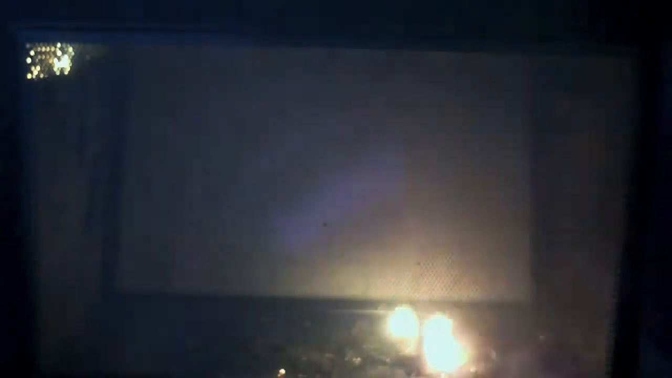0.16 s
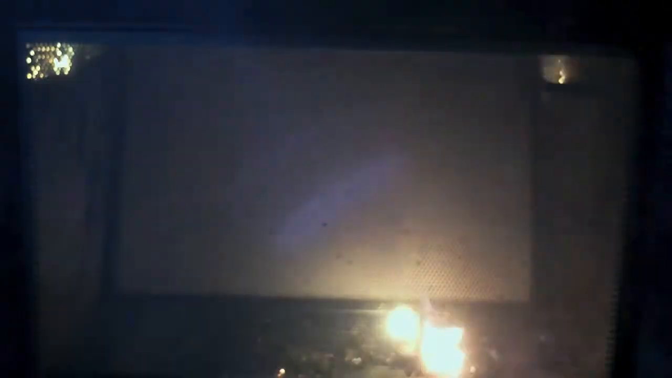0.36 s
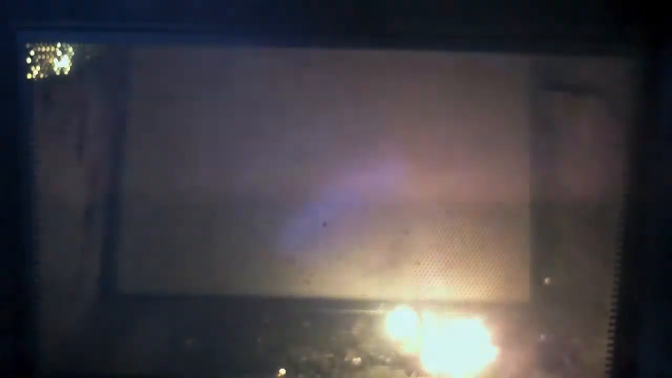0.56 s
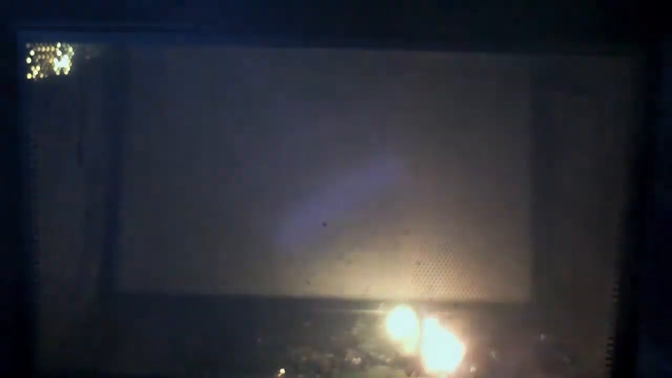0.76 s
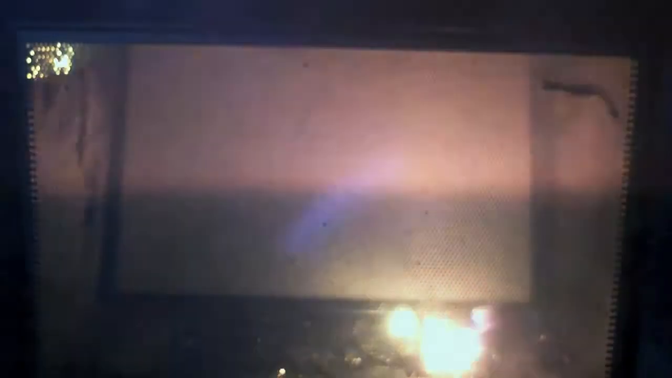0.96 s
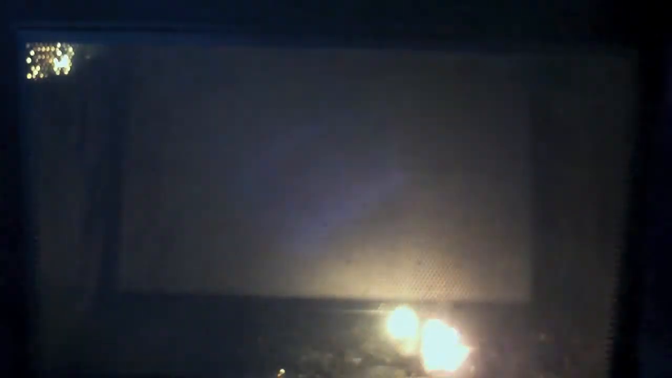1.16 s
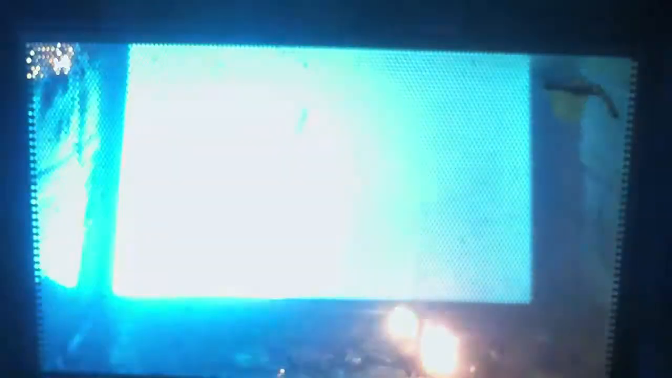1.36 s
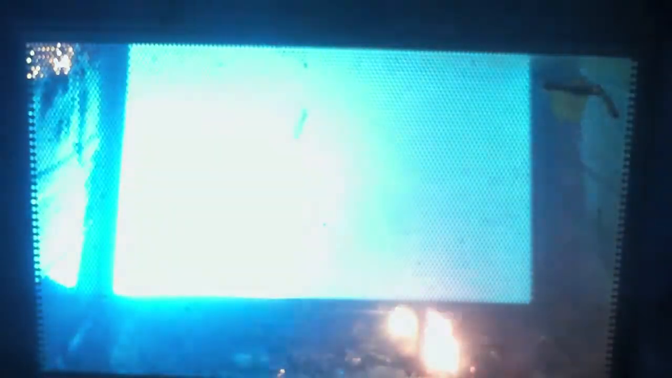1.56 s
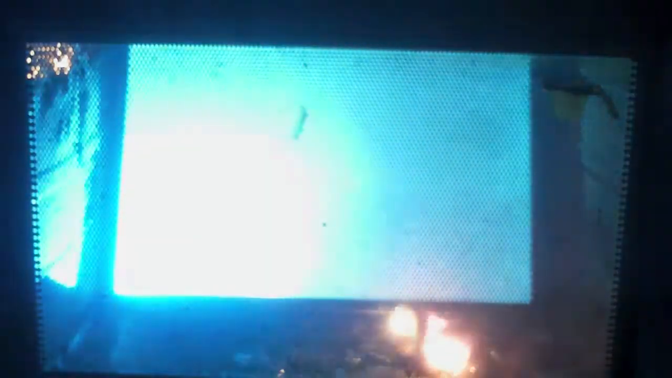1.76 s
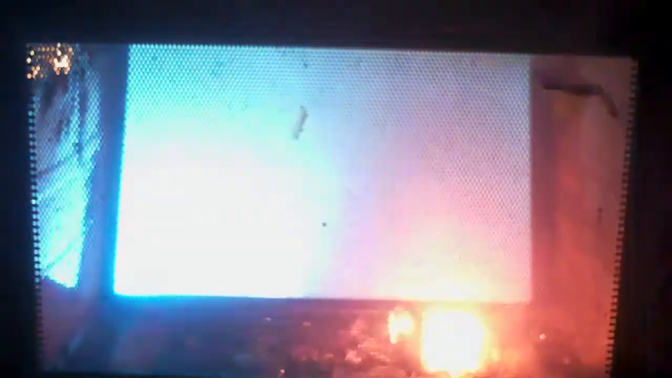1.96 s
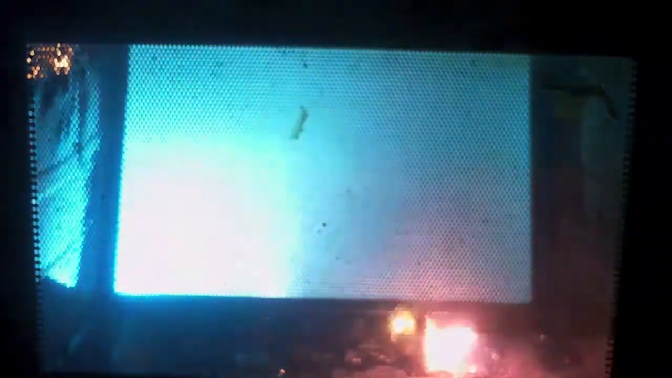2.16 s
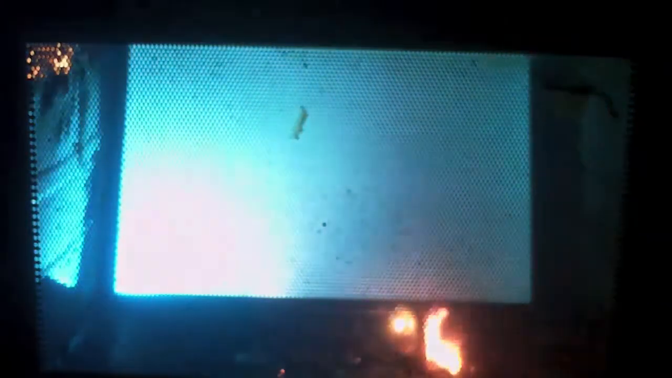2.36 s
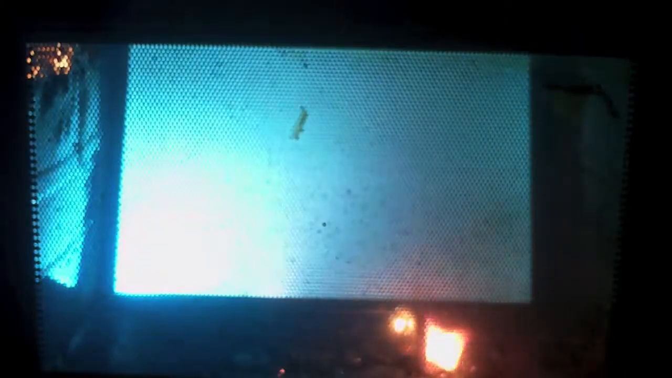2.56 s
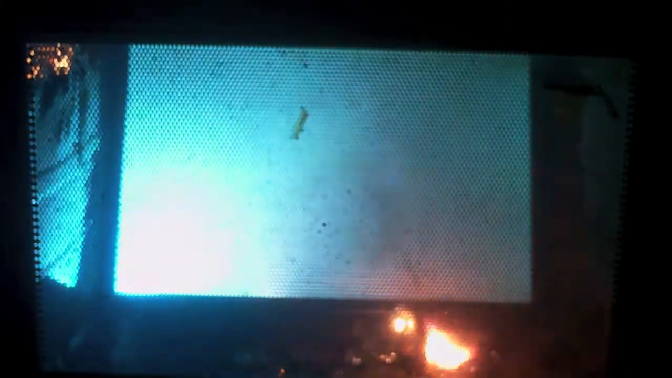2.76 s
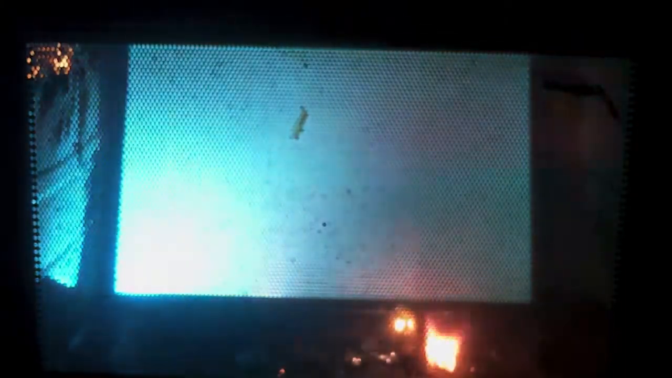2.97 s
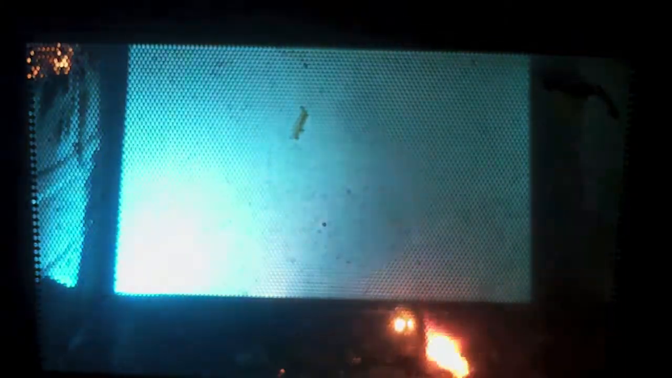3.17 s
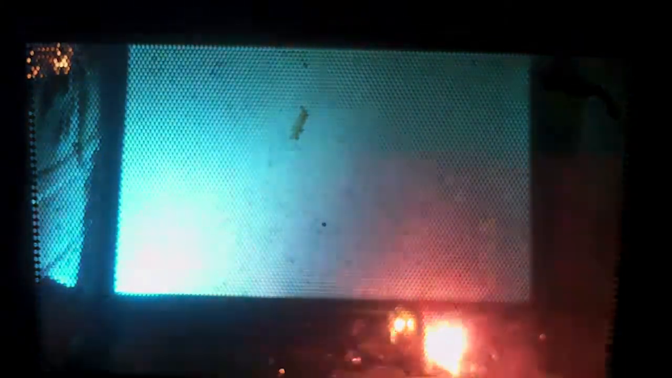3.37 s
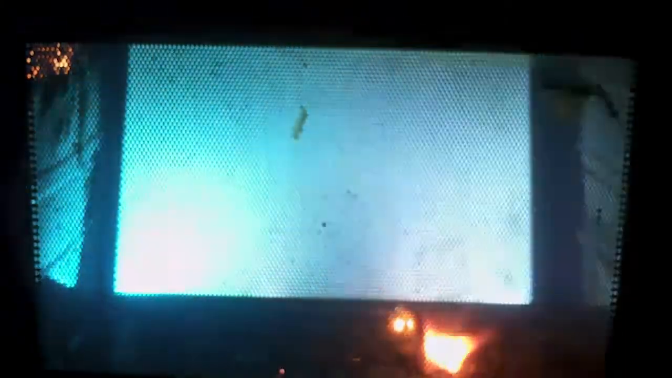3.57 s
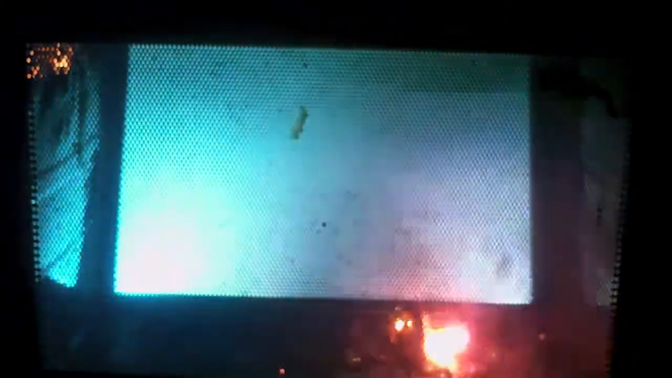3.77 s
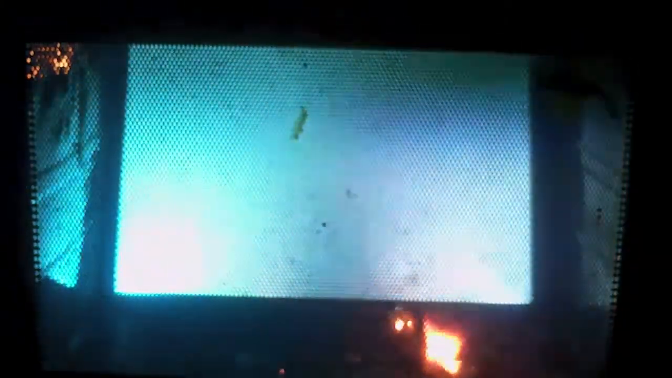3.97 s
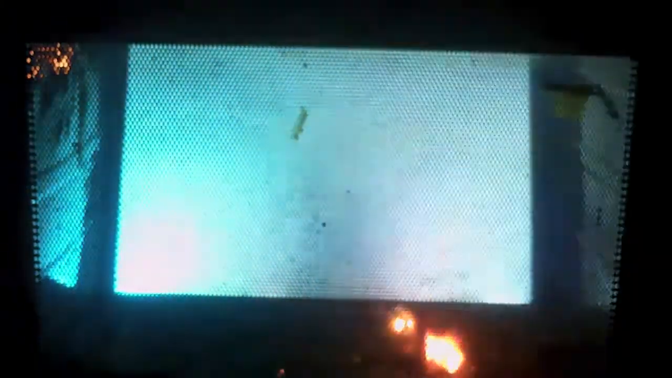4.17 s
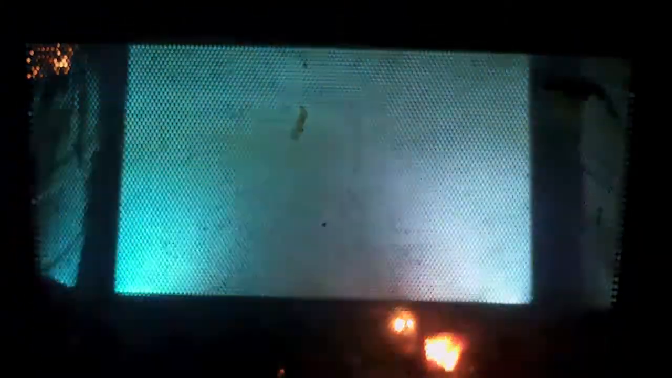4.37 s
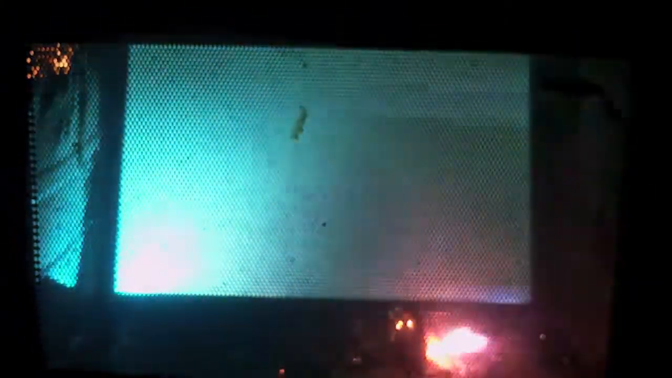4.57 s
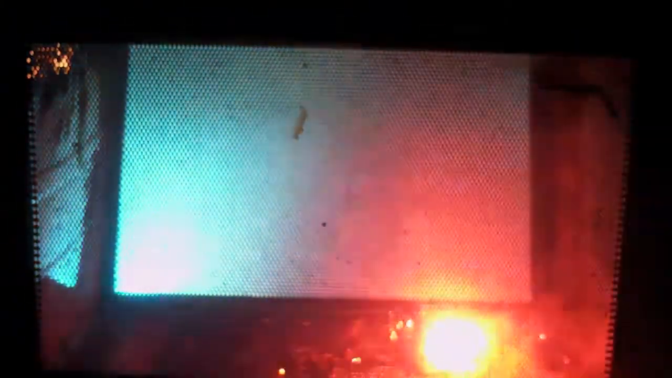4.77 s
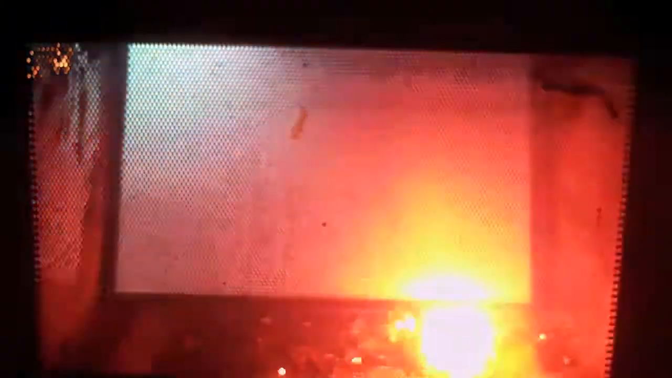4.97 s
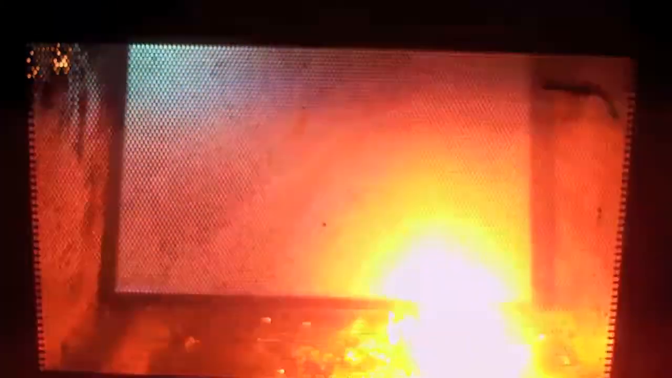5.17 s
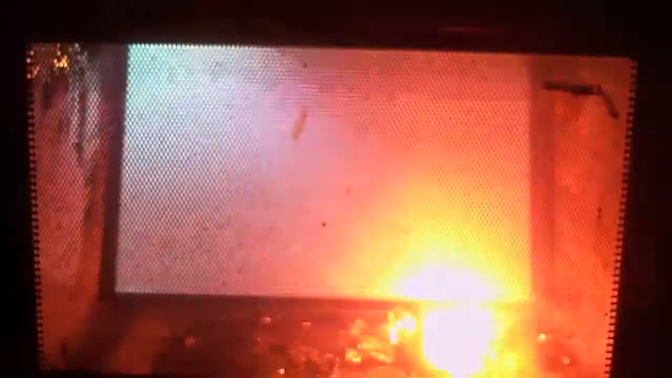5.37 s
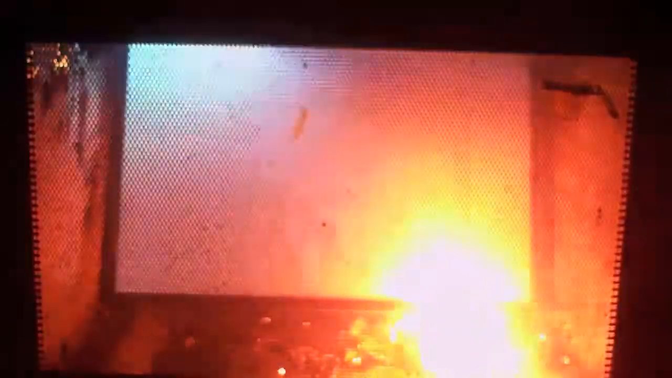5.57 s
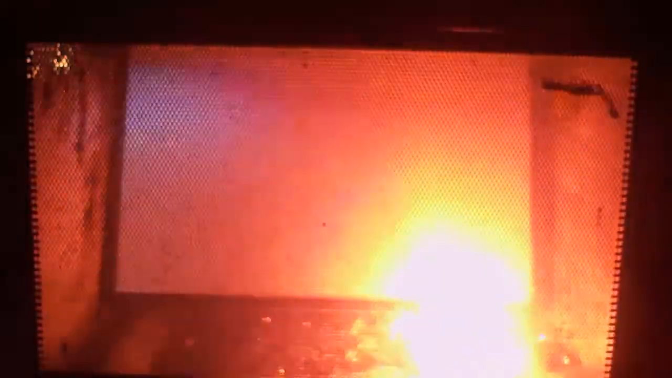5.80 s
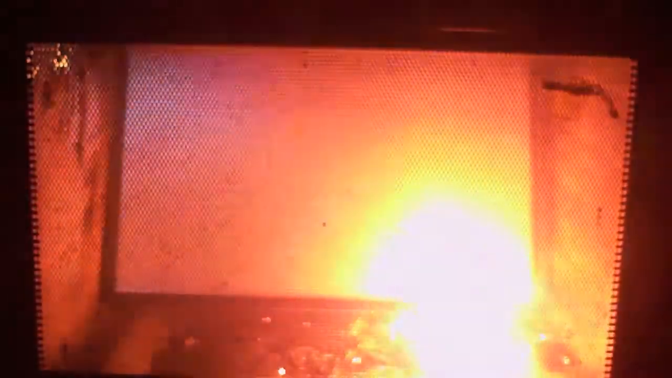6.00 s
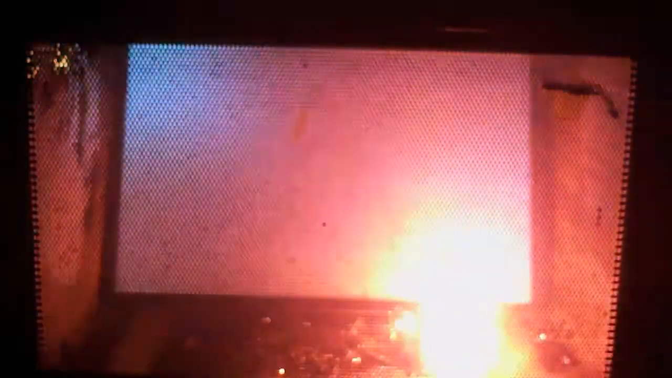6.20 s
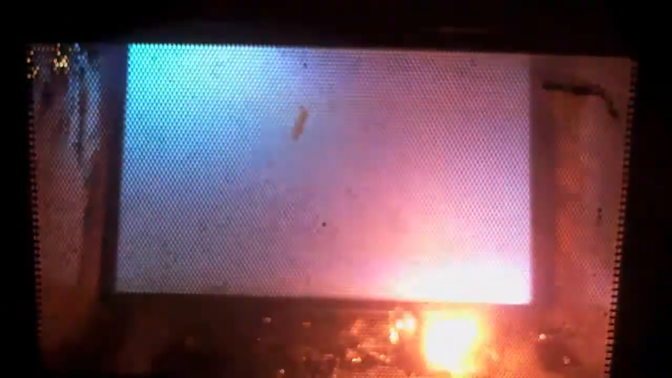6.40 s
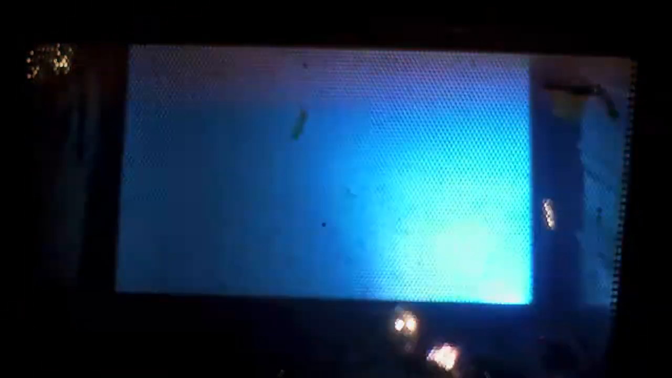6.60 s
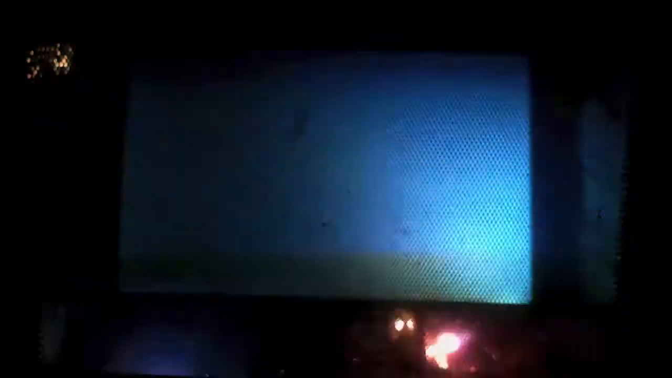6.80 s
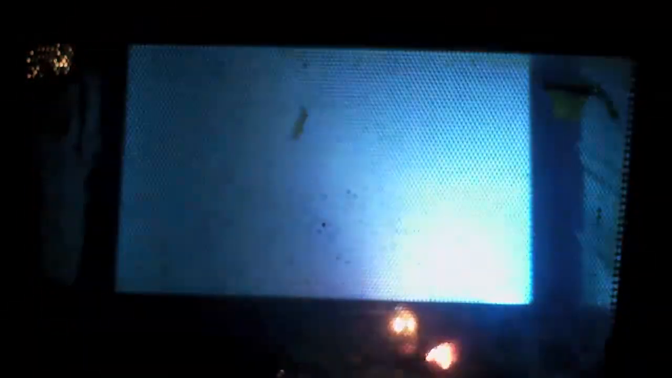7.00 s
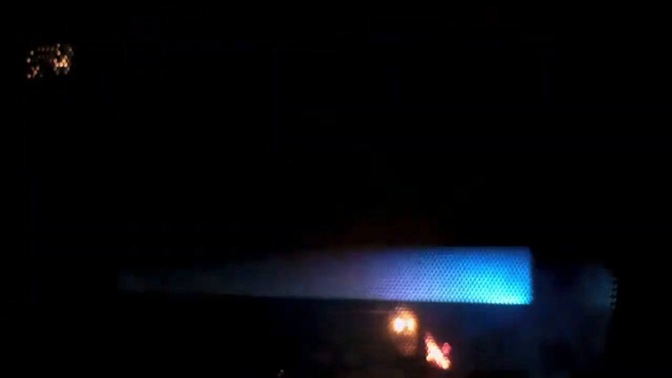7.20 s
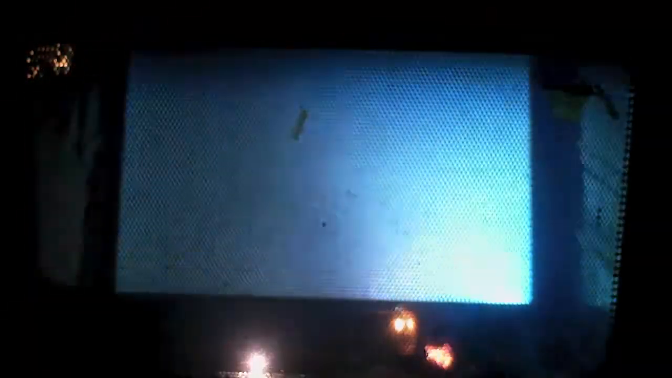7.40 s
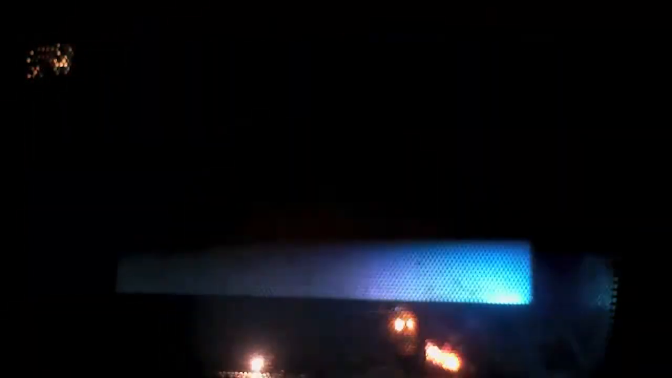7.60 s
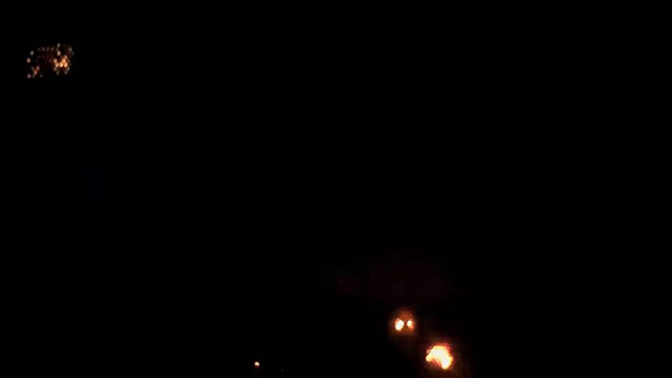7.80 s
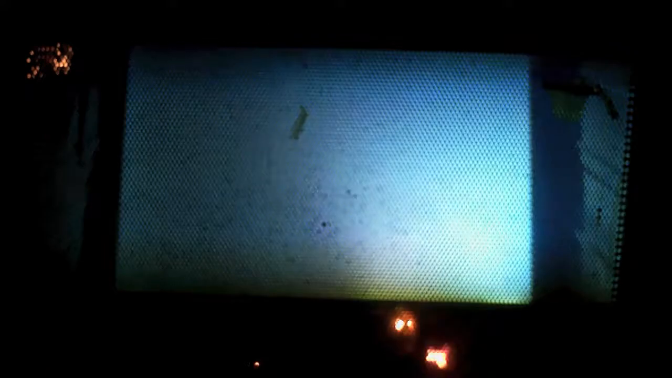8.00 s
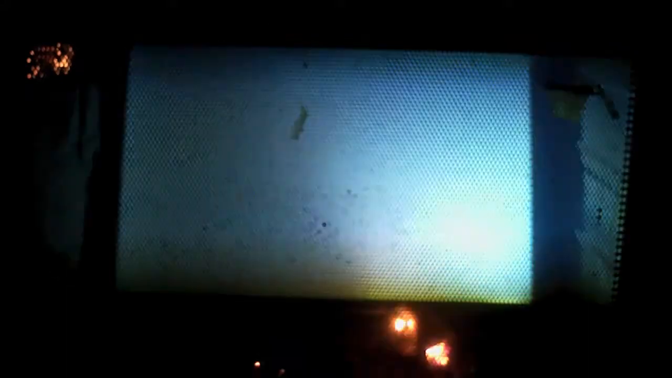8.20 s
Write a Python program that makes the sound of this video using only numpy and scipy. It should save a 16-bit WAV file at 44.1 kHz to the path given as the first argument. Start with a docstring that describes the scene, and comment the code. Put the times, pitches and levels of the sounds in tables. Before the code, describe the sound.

Over steady low transformer hum and fan air, sparse metallic sparks and spits give way to a loud rasping mains buzz, then more crackling.

```python
"""A burning microwave oven, heard in a small kitchen, over its transformer hum and fan all the way through.
First a faint glow discharge fries once per mains cycle, with small spits and single sparks that knock on the cavity.
After 4.4 s an arc strikes on every cycle and buzzes for two seconds; its sizzle sputters before it goes out.
Then come more sparks and spits. Pulses ring the cavity, noisy snaps also bounce between its metal walls;
hum and fan tones are sines, the fan's air is filtered noise."""
import sys
import numpy as np
from scipy import signal
from scipy.fft import rfft, irfft
from scipy.io import wavfile
from scipy.ndimage import uniform_filter1d

SR = 44100
rng = np.random.default_rng(int(sys.argv[2]) if len(sys.argv) > 2 else 0)


def unload_audio(sound):
    """Save the sound as a 16-bit wav file, at the path given as the first command line argument."""
    columns = np.transpose(np.atleast_2d(sound))
    # keep every value between -1 and 1, then stretch to whole-number steps
    steps = np.round(np.clip(columns, -1, 1) * 32767)
    wavfile.write(sys.argv[1], SR, steps.astype(np.int16))


N = 363825

TIME = np.arange(N) / SR  # s
MAINS_HZ, FIRST_FIRING_S = 60.0, .0139
ARC_START_S, ARC_END_S = 4.42, 6.59


def from_db(db):
    """Decibels to gain."""
    return 10 ** (np.asarray(db) / 20)


def rms_one(x):
    """Scale to an rms of one."""
    return x / np.sqrt(np.mean(x ** 2) + 1e-20)


def drift(rate):
    """Slow random curve with an rms of one, from `rate` random points per second joined by lines."""
    knots = rng.standard_normal(1000)
    return rms_one(np.interp(TIME * rate, np.arange(len(knots)), knots))


def noise(spectrum, size=N):
    """Steady noise of a given colour, rms one."""
    hz, db = np.transpose(spectrum)
    bins = np.maximum(np.arange(size // 2 + 1) * SR / size, 1)
    gain = from_db(np.interp(np.log(bins), np.log(hz), db))
    return rms_one(irfft(rfft(rng.standard_normal(size)) * gain, size))


def resonance(x, hz, width):
    """Two-pole resonance with a gain of one on top."""
    r = np.exp(-np.pi * width / SR)
    feedback = [1, -2 * r * np.cos(2 * np.pi * hz / SR), r * r]
    return signal.lfilter(np.array([1, 0, -1]) * (1 - r * r) / 2, feedback, x)


def low_pass(x, hz):
    """Gentle loss of treble."""
    return signal.sosfilt(signal.butter(1, min(hz, SR / 2 - 1), fs=SR, output="sos"), x)


def convolve(x, response):
    """Play x through a response."""
    return signal.fftconvolve(x, response)[:N]


def firings(jitter_s, wander_s=.00016):
    """One breakdown per mains cycle; its moment wanders as the panel burns and is a little early or late."""
    times = np.arange(FIRST_FIRING_S, N / SR, 1 / MAINS_HZ)
    wander = wander_s * np.interp(times, TIME, drift(12))
    return times + wander + jitter_s * rng.standard_normal(len(times))


def clicks(times, db, length_ms):
    """Pressure pulses, equally strong near 900 Hz: short ones crack, long ones thud."""
    out = np.zeros(N + SR)
    t = TIME[:SR // 100]
    for s, gain, tau in zip(times, from_db(db), np.clip(length_ms, .02, .6) / 1000):
        shape = t * np.exp(-t / tau)
        evened = gain * (1 + (2 * np.pi * 900 * tau) ** 2)
        at = round(s * SR)
        out[at:at + len(t)] += evened * shape / shape.sum()
    return out[:N]


def crackle(times, db, burn_s, count=12):
    """Each discharge is a quick run of tiny snaps that thins out; db is the strength of the whole run."""
    delay = rng.exponential(1, (len(times), count))
    snap = rng.standard_normal((len(times), count))
    delay = burn_s * (delay - delay.min(axis=1, keepdims=True))  # the first snap comes at once
    snap = from_db(db)[:, None] * snap / np.linalg.norm(snap, axis=1, keepdims=True)
    out = np.zeros(N + SR)
    np.add.at(out, np.round((times[:, None] + delay) * SR).astype(int), snap)
    return out[:N]


def arc(knock_scatter_db=2.0, sizzle_scatter_db=2.5, surge_db=0.5, surges_per_s=9, misfire_db=-14,
        pulse_ms=0.078, pulse_scatter=0.19, burn_s=.002):
    """A spark on every cycle makes the buzz; it surges a little, and sparks vary in strength and sharpness."""
    # cycles on which the arc hardly strikes: (time [s])
    misfires = [4.747, 6.064]
    knock_db, sizzle_db, growth_db_per_s = -25, -36.5, 0.74
    heat_up_s, cold_loss_db = 0.13, 6
    sputter_s, sputter_loss_db, sputter_scatter_db = 0.58, 8, 6.5

    times = firings(jitter_s=.00011)
    times = times[(times > ARC_START_S) & (times < ARC_END_S)]
    cold = np.clip(1 - (times - ARC_START_S) / heat_up_s, 0, 1)
    dying = np.clip(1 - (ARC_END_S - times) / sputter_s, 0, 1)
    missed = np.abs(times[:, None] - misfires).min(axis=1) < .5 / MAINS_HZ

    growth = growth_db_per_s * (times - ARC_START_S)
    surge = surge_db * np.interp(times, TIME, drift(surges_per_s))
    power = growth + surge + misfire_db * missed
    strength, sharpness = rng.standard_normal((len(times), 2)).T
    body = knock_db + power + knock_scatter_db * strength
    # the sizzle builds up as the arc heats, holds, and sputters away at the end
    fry = sizzle_db + power - cold_loss_db * cold - sputter_loss_db * dying
    fry = fry + (sizzle_scatter_db + sputter_scatter_db * dying) * sharpness
    length_ms = pulse_ms * np.exp(-pulse_scatter * sharpness)
    return clicks(times, body, length_ms), crackle(times, fry, burn_s)


def sparks(knock_db=0.5, sizzle_db=1.5, knock_lag_s=.0007, burn_s=.002):
    """Lone sparks: a crackle and, just behind its first snap, a pulse; those that hardly sizzle thud."""
    # sparks that knock, before and after the arc: (time [s], knock level [dB], sizzle level [dB])
    knocking = [(0.064, -27.5, -42.5), (0.114, -26.5, -42), (0.232, -24, -43.5), (0.264, -29.5, -39),
                (0.45, -29, -54), (0.534, -28, -45), (0.665, -25, -42), (0.884, -30.5, -58.5),
                (0.915, -32, -57), (0.933, -26.5, -50), (0.999, -26, -45.5), (1.234, -26, -50.5),
                (1.266, -31, -44), (1.383, -28, -54.5), (1.917, -26, -54), (1.947, -24, -49),
                (2.166, -32, -43), (2.181, -23, -36.5), (2.197, -28.5, -38), (2.933, -26, -41.5),
                (3.314, -24.5, -40.5), (3.366, -25, -44), (3.381, -25.5, -39.5), (3.715, -26.5, -44.5),
                (3.764, -24, -43.5), (6.629, -23, -43.5), (6.797, -22.5, -40), (6.816, -19.5, -41),
                (6.83, -20.5, -44), (7.133, -27.5, -56.5), (7.268, -34, -38.5), (7.647, -23, -38.5)]
    # a spark that sizzles more cracks more sharply: the pulse halves for each halving_db of sizzle
    usual_pulse_ms, usual_sizzle_db, halving_db = 0.097, -42, 9
    times, body_db, fry_db = np.transpose(knocking)
    length_ms = usual_pulse_ms * 2 ** ((usual_sizzle_db - fry_db) / halving_db)
    pulses = clicks(times + knock_lag_s, body_db + knock_db, length_ms)
    return pulses, crackle(times, fry_db + sizzle_db, burn_s)


def spits(level_db=-6.5, burn_s=.0006):
    """Sparks too small to knock: very short runs of a few snaps."""
    # the loudest of the sparks that only spit: (time [s], level [dB])
    spitting = [(0.0976, -37), (0.5464, -35.5), (1.1976, -37), (1.497, -43.5), (2.0966, -35),
                (2.9816, -39.5), (3.2814, -35), (3.3998, -31.5), (3.4308, -30), (3.483, -36),
                (3.5306, -36.5), (3.8142, -27.5), (4.1639, -28.5), (7.0635, -31.5), (7.1118, -39),
                (7.1811, -40.5), (7.2784, -38), (7.4295, -34), (7.4475, -36), (7.4627, -32.5),
                (7.4962, -32.5), (7.5632, -28.5), (7.5966, -37.5), (7.7966, -32), (8.2124, -30.5)]
    times, db = np.transpose(spitting)
    return crackle(times, db + level_db, burn_s, count=5)


def glow(level_db=9.5, scatter_db=2.5, burn_s=.004):
    """A faint discharge fries in each cycle while the magnetron is on, and now and then spits by chance."""
    # level of the glow before the arc: (time [s], level [dB])
    glow_before = [(0.0, -57), (0.44, -56), (0.6, -63), (1.4, -67.5), (2.67, -67), (2.83, -65),
                   (3.3, -63.5), (3.42, -63), (3.7, -60.5), (3.9, -65), (4.1, -65), (4.4, -64.5)]
    # level of the glow after the arc: (time [s], level [dB])
    glow_after = [(6.65, -65), (6.854, -71), (7.086, -69.5), (7.246, -64), (7.62, -63), (8.25, -66)]
    # share of the cycles that spit, up to the end of the arc and after it
    chance_before, chance_after, spit_rise_db = .025, .2, 7.5

    times = firings(jitter_s=0.00025)
    curve_s, curve_db = np.vstack([glow_before, glow_after]).T
    db = np.interp(times, curve_s, curve_db)
    chance = np.where(times < ARC_END_S, chance_before, chance_after)
    spitting = rng.random(len(times)) < chance
    db = db + level_db + spit_rise_db * spitting + scatter_db * rng.standard_normal(len(times))
    return crackle(times, db, burn_s, count=40)


def knock(x, echo_s=.00413, echo_share=0.32, panel_lag_s=.00052):
    """The air in the cavity rings at once, the panels a little later; a wall sends one echo."""
    # ringing modes of the cavity: (frequency [Hz], width [Hz], level [dB])
    cavity = [(107, 37, -26), (192, 31.6, -4.5), (301.2, 31, -9.5), (385, 58, -13), (619, 30, -5),
              (808, 59.4, 2.5), (944.3, 39, -2), (980, 32, -2.5), (983, 24, -10.5), (1322.3, 36.4, 3),
              (1379, 13, -3.5), (1440, 20, -3.5), (1700, 80, -7.5), (1910, 15, -6.5), (2360, 32, -4),
              (2466, 93, -7.5), (2710, 19, -2), (2953, 106, -2.5), (3206, 28, -1), (3530, 17, -2),
              (3890, 98, 1.5), (4200, 19, -8.5), (4600, 53, -5)]
    panel_hz = 1600  # modes from here up belong to the sheet-metal panels
    t = TIME[:SR // 5]
    ring = 0
    for hz, width, db in cavity:
        mode = from_db(db) * resonance(signal.unit_impulse(len(t)), hz, width)
        if hz >= panel_hz:
            mode = np.interp(t - panel_lag_s, t, mode, left=0)
        ring = ring + mode
    ring = ring + echo_share * np.interp(t - echo_s, t, ring, left=0)
    # scaled to a peak of one between 600 and 1600 Hz
    band = signal.sosfilt(signal.butter(2, [600, 1600], "band", fs=SR, output="sos"), ring)
    return convolve(x, ring / np.abs(band).max())


def sizzle(snaps, fade_s=0.0065, count=4):
    """Snaps bounce densely between the metal walls, each along one of several paths, and turn into a sizzle."""
    # colour of the sizzle: (frequency [Hz], relative density [dB per Hz])
    sizzle_colour = [(300, -7), (1000, 9), (1450, 3.5), (1650, -6), (2100, -9), (2350, 5), (3300, 5.5),
                     (4000, 6), (5200, -3), (6600, 0.5), (9500, 0), (12000, -3.5), (13500, -6.5),
                     (15000, -52)]
    t = TIME[:SR // 10]
    path = rng.integers(0, count, N)
    out = 0
    for k in range(count):
        bounces = noise(sizzle_colour, size=len(t)) * np.exp(-t / fade_s)
        out = out + convolve(snaps * (path == k), bounces)
    return out


def kitchen(x, t60=0.28, wall_hz=3500, first_echo_s=0.0096, wet_db=-12):
    """Dense, dull reflections of a small room; t60 in seconds."""
    t = TIME[:SR // 2]
    tail = rng.standard_normal(len(t)) * from_db(-60 * t / t60) * (t > first_echo_s)
    return x + from_db(wet_db) * convolve(x, low_pass(tail / np.linalg.norm(tail), wall_hz))


def machine(hum_waver_db=0.96, fan_waver_db=3, fan_wander=0.97, air_db=-48.5):
    """Transformer lines locked to the mains, the fan's unsteady tones (wander in radians) and its rush of air."""
    # transformer hum: (multiple of the mains, level [dB rms], change while the arc burns [dB])
    hum = [(1, -65.5, 11.5), (2, -51.5, 2.5), (3, -67.5, 8), (4, -47, -14), (5, -82, 23), (6, -62, 1.5),
           (7, -68, 2), (10, -66, -9), (14, -63, 3.5)]
    # fan tones: (frequency [Hz], level [dB rms])
    fan_tones = [(28.8, -70), (145, -96), (203, -88), (289, -73.5), (452, -86), (1168, -63.5)]
    # colour of the fan's air: (frequency [Hz], relative density [dB per Hz])
    fan_air = [(20, 3.5), (60, -12), (110, 2), (180, 4), (250, 6), (330, -7.5), (430, -2.5), (540, -5.5),
               (850, -1), (1100, -2), (1330, -0.5), (1600, -14), (4000, -28), (13000, -46)]
    out = from_db(air_db) * noise(fan_air)
    burning = (TIME > ARC_START_S) & (TIME < ARC_END_S)
    arcing = uniform_filter1d(1.0 * burning, size=1500)  # softened over 34 ms
    for multiple, db, arc_change_db in hum:
        phase = 2 * np.pi * round(multiple) * MAINS_HZ * (TIME - FIRST_FIRING_S)
        level = db + arc_change_db * arcing + hum_waver_db * drift(5)
        out = out + np.sqrt(2) * from_db(level) * np.sin(phase)
    for hz, db in fan_tones:
        phase = 2 * np.pi * hz * TIME + fan_wander * drift(6)
        out = out + np.sqrt(2) * from_db(db + fan_waver_db * drift(4)) * np.sin(phase)
    return out


def scene(snap_ring_db=-7.0):
    """Pulses and snaps sound through the oven into the room, over the running machine."""
    arc_pulses, arc_snaps = arc()
    spark_pulses, spark_snaps = sparks()
    snaps = arc_snaps + spark_snaps + spits() + glow()
    bright = snaps - low_pass(snaps, 3100)  # tiny snaps mainly ring the high modes
    struck = arc_pulses + spark_pulses + from_db(snap_ring_db) * bright
    oven = knock(struck) + sizzle(snaps)
    return (kitchen(oven) + machine())[None]


def record(dry, notch_hz=7900, notch_q=11, cutoff_hz=14900):
    """The microphone has a narrow dip in the treble; the top is cut."""
    notched = signal.lfilter(*signal.iirnotch(notch_hz, notch_q, fs=SR), dry)
    coloured = .15 * dry + .85 * notched  # the dip is not complete
    return signal.sosfilt(signal.ellip(10, .2, 80, cutoff_hz, fs=SR, output="sos"), coloured)


dry = scene()
out = record(dry)
unload_audio(out)
```